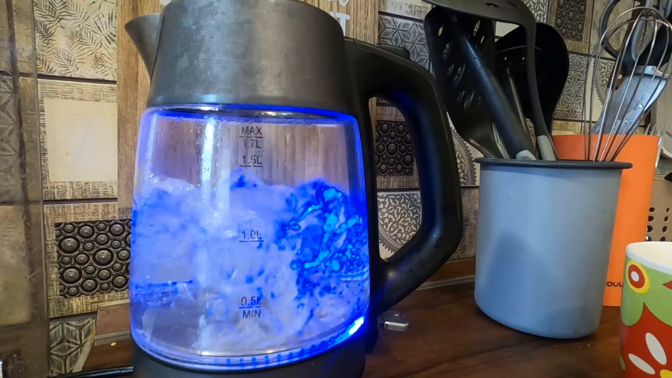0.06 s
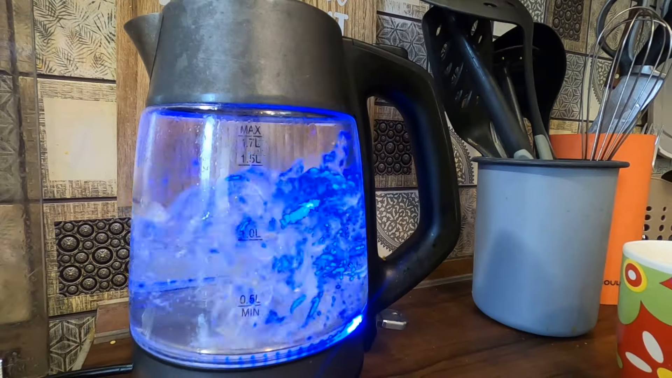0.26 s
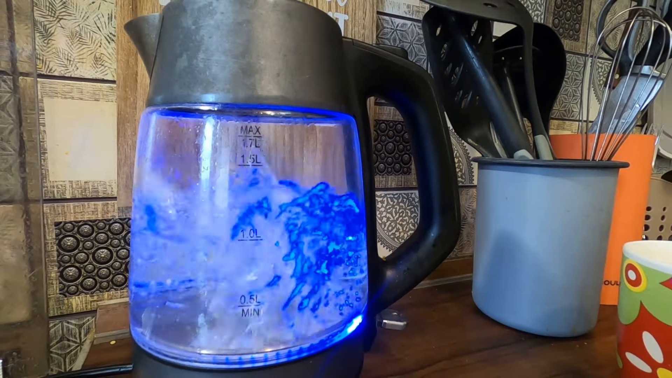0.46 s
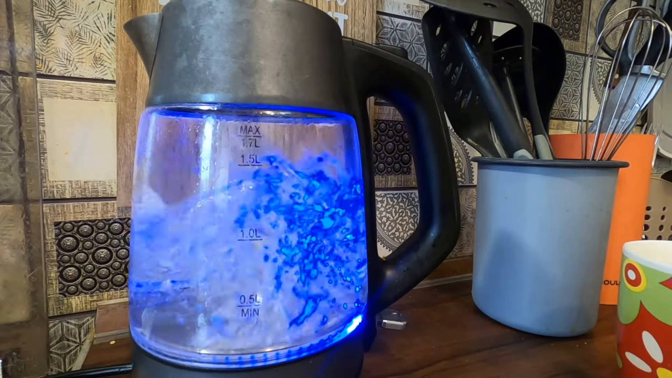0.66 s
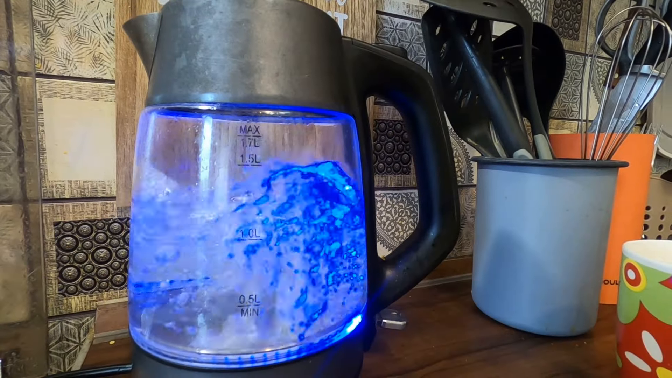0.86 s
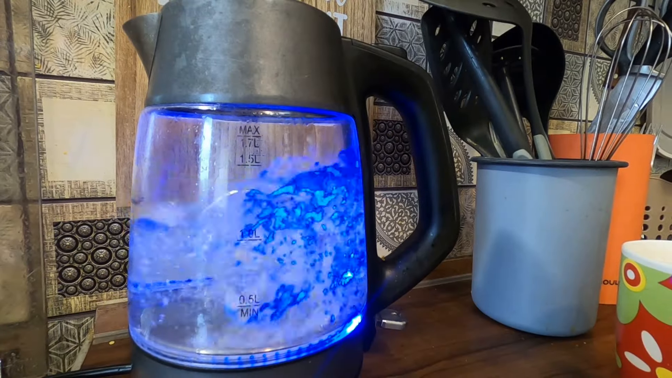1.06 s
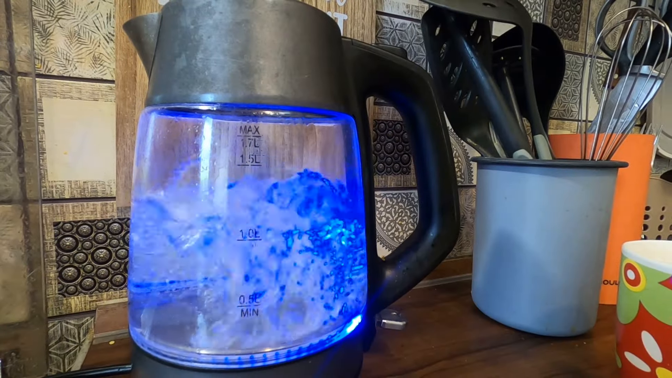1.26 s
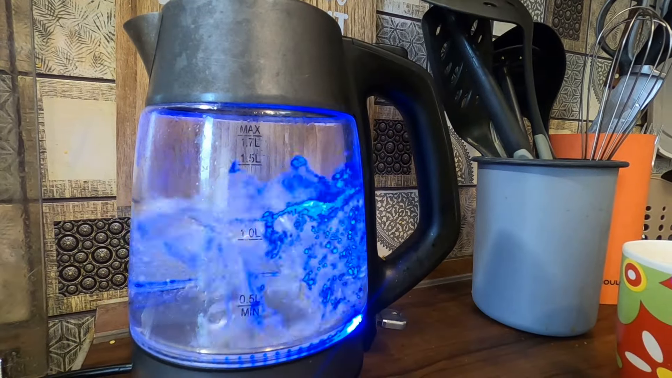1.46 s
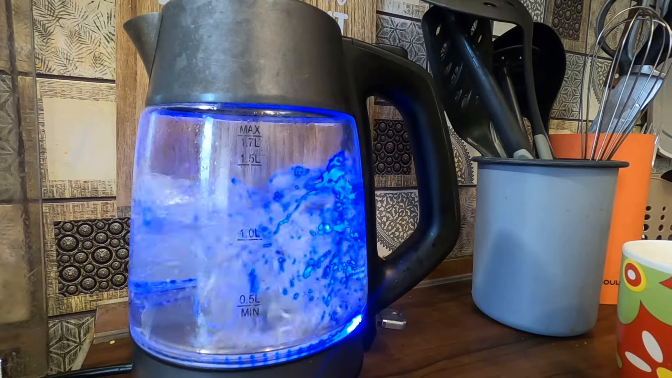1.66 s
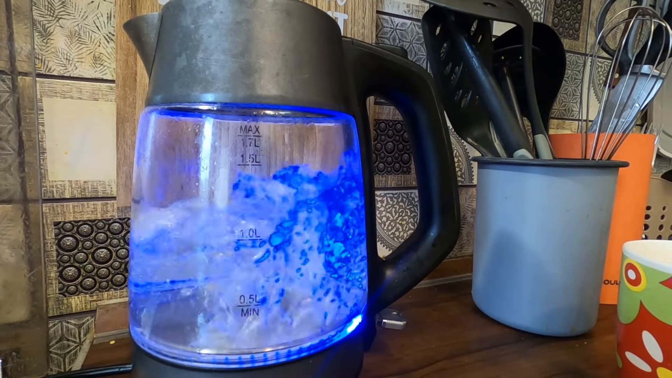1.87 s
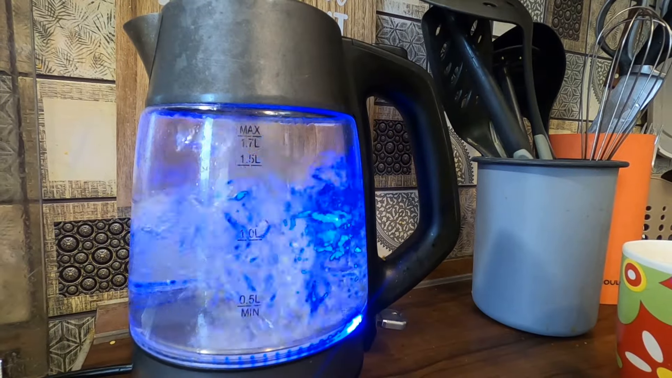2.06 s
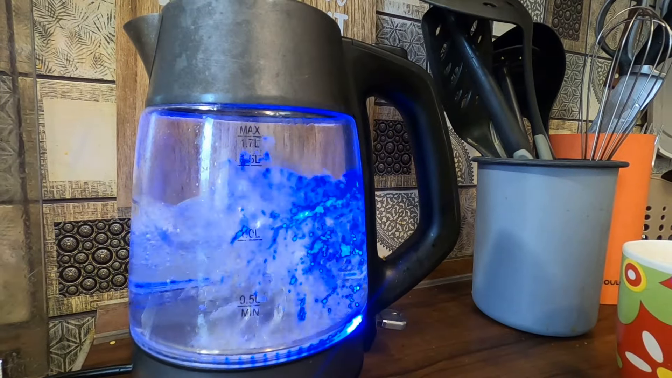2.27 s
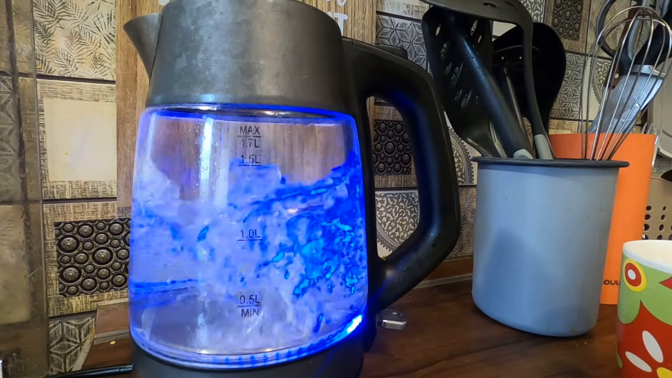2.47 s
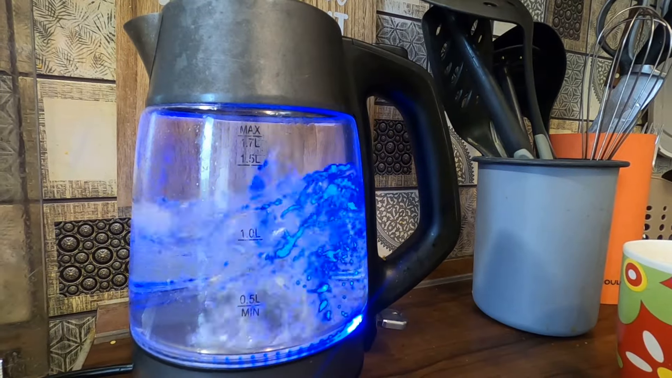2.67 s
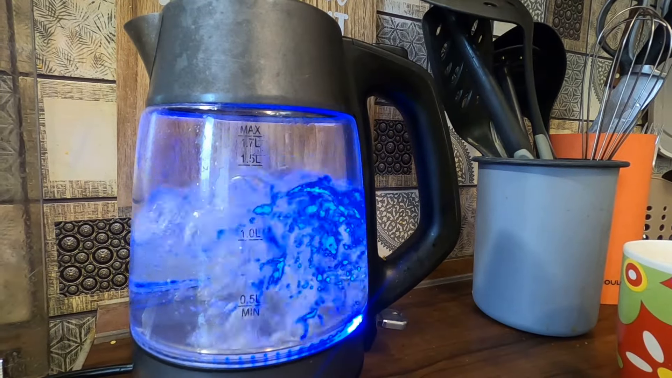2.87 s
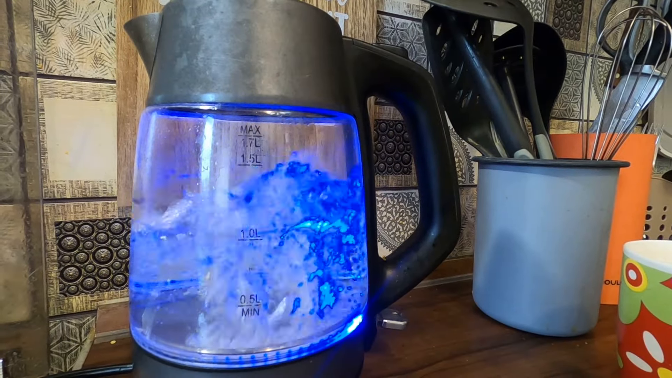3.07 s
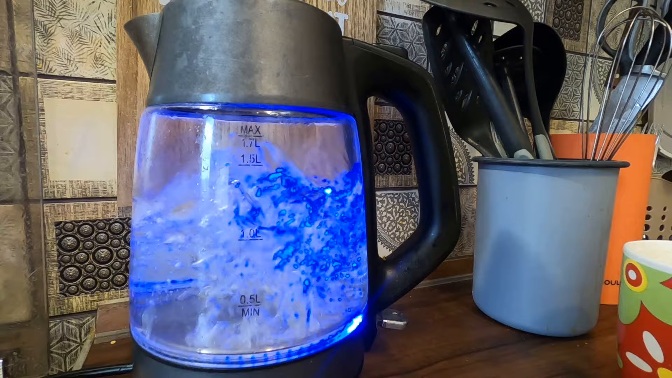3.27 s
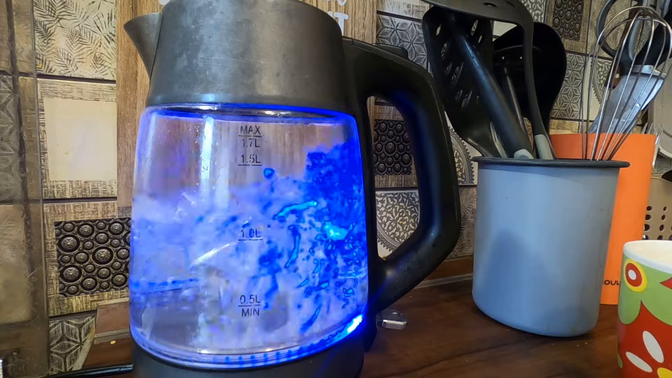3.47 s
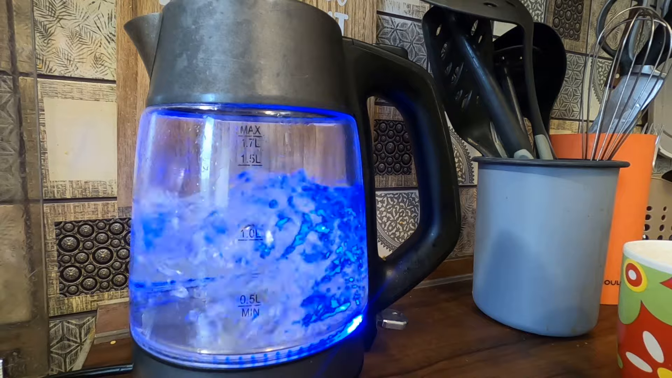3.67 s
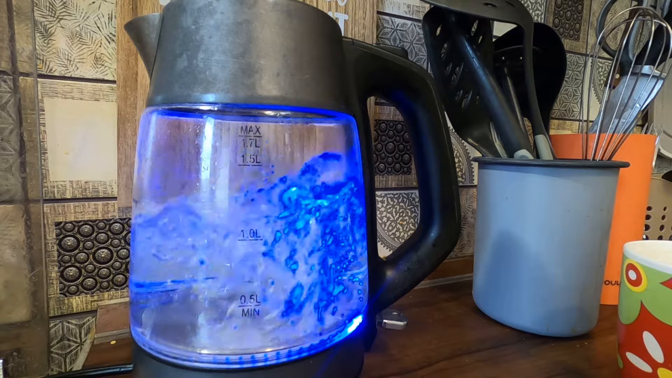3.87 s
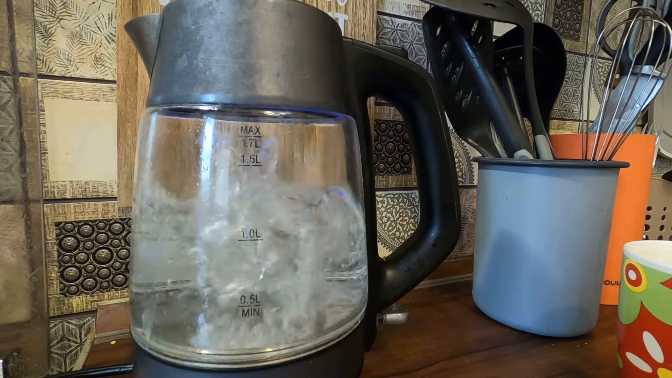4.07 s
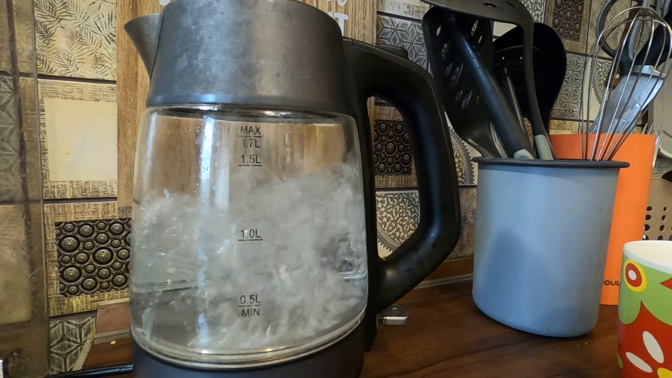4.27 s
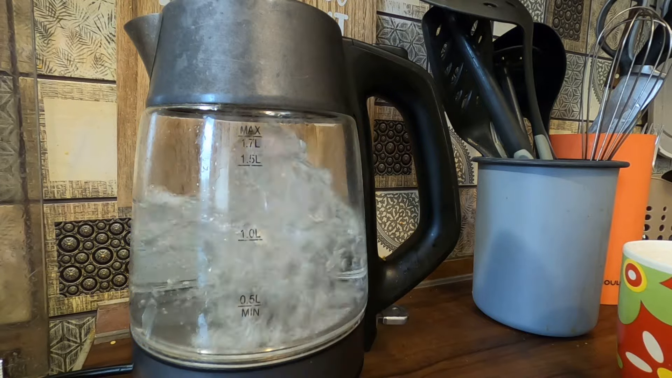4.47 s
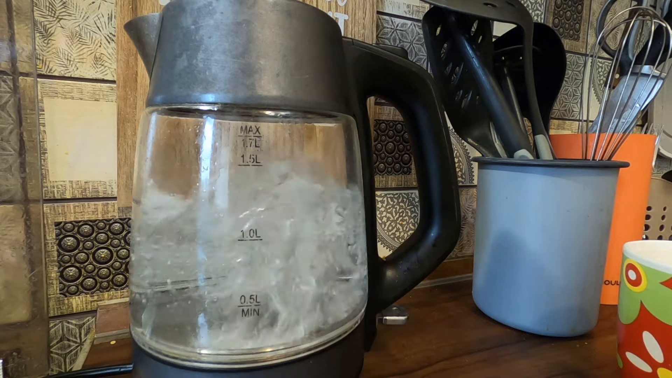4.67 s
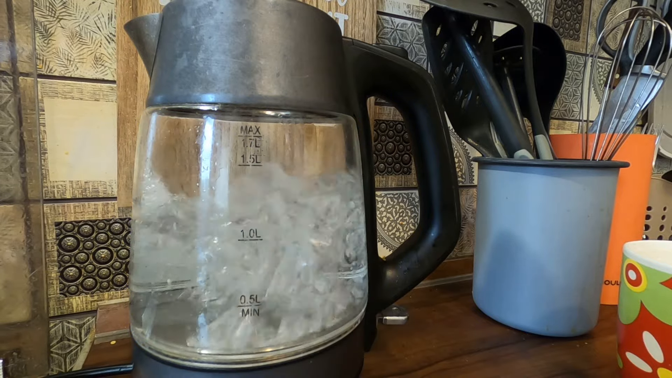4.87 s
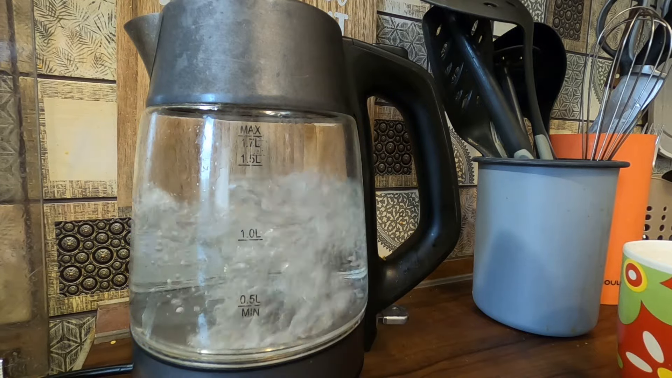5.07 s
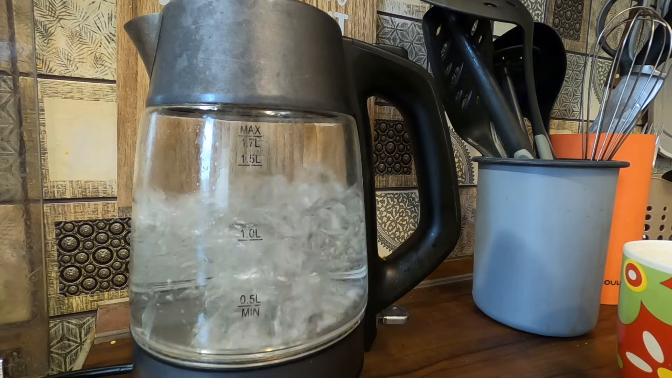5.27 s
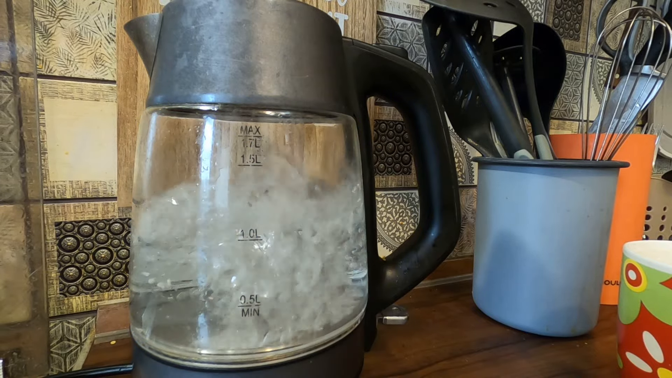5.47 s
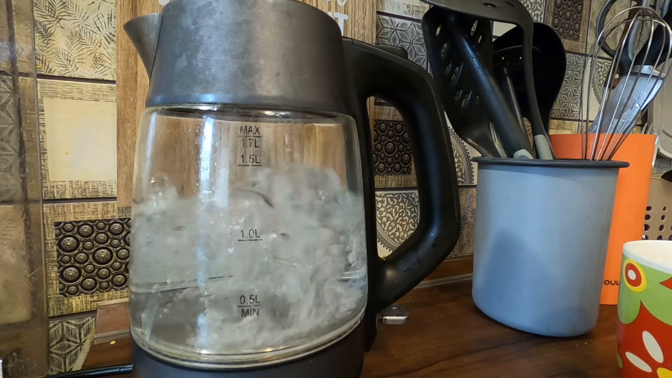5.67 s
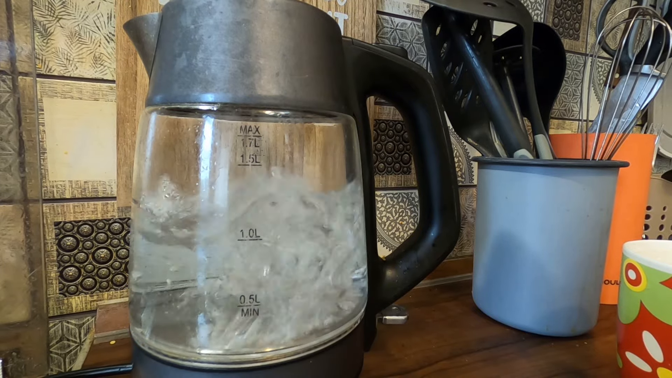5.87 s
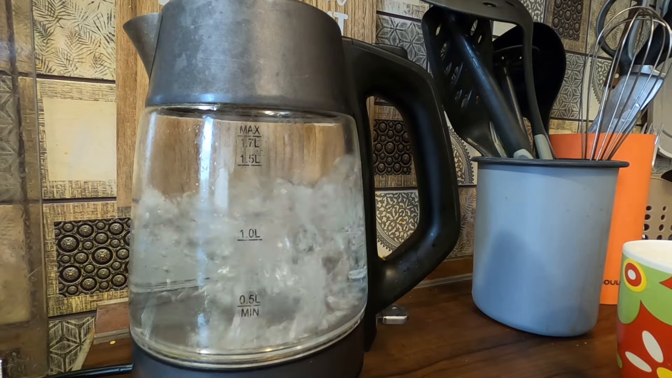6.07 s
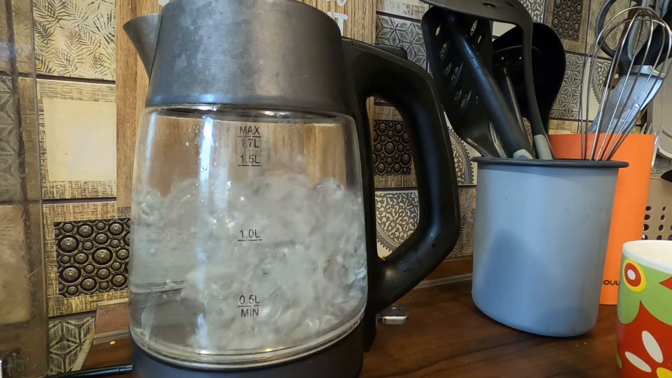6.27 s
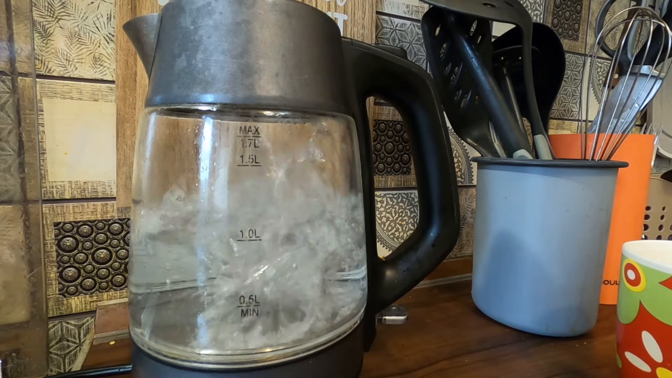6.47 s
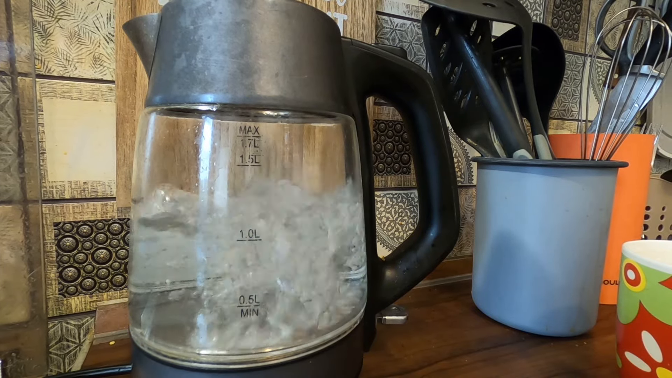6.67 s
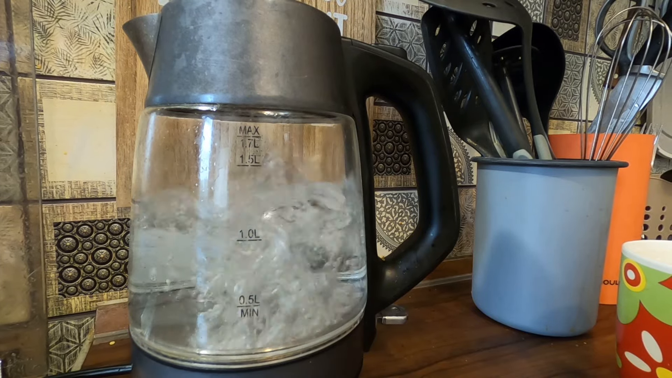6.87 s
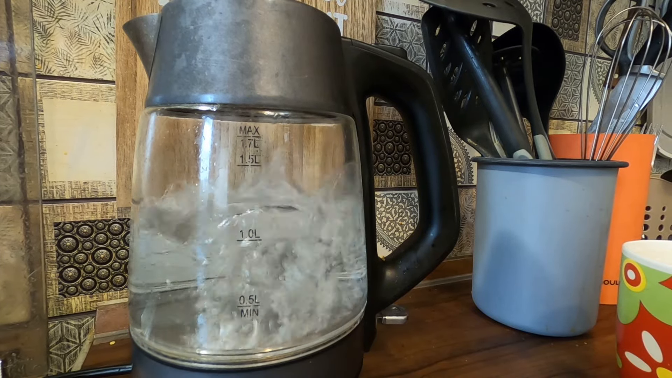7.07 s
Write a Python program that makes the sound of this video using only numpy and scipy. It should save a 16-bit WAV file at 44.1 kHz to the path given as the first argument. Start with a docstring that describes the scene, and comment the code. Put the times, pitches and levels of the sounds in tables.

```python
"""A deep, uneven rumble and thumping is heard first: a glass kettle at a rolling boil, close by, in mono.
Collapsing steam pockets excite the modes of water, counter and jug by short blows.
The surface gurgles, spits and ticks: noise in bursts and ringing bubbles, filtered by the glass wall.
The level drops out briefly near the start; later a switch snaps off as struck modes and a crack of noise.
A wide hiss, noise independent in the two channels, sets in abruptly at the end."""
import sys
import numpy as np
from scipy import signal
from scipy.io import wavfile
from scipy.ndimage import uniform_filter1d

SR = 44100
rng = np.random.default_rng(int(sys.argv[2]) if len(sys.argv) > 2 else 0)


def wav_out(sig):
    """Save sig, one row per channel (or a flat mono array), as 16-bit PCM at SR to the path in sys.argv[1]."""
    wavfile.write(sys.argv[1], SR, np.round(np.clip(np.atleast_2d(sig).T, -1, 1) * 32767).astype(np.int16))


N = 314433

# Swell of the boil, before wavering and bursts: time_s, jug_rumble_db, counter_drone_db, gurgle_db, spray_db
BOIL_LEVELS = [(.05, -27, -38.5, -47, -54.5), (.3, -32, -38.5, -45, -55.5), (.5, -33, -37, -45, -59.5),
               (.9, -30.5, -31.5, -46, -55.5), (1.25, -35, -37, -45.5, -57.5),
               (1.4, -30.5, -32, -49, -56.5), (1.51, -29, -36, -43.5, -56.5), (1.6, -29.5, -30, -48, -52.5),
               (1.75, -34.5, -40.5, -47, -59.5), (1.95, -30.5, -38, -46.5, -56.5),
               (2.09, -32, -44, -46.5, -59.5), (2.15, -33.5, -30.5, -54, -51.5),
               (2.3, -30.5, -35.5, -45, -61), (2.42, -32.5, -52, -46, -55.5),
               (2.48, -32.5, -30.5, -48.5, -58.5), (2.63, -29, -45.5, -45, -57.5),
               (2.7, -33.5, -28, -47.5, -53.5), (2.8, -31, -28.5, -48, -56.5),
               (2.9, -31.5, -32.5, -46.5, -57.5), (2.95, -33.5, -44, -50, -59.5),
               (3.1, -32.5, -34, -44.5, -57), (3.2, -39.5, -27, -44, -60), (3.26, -33, -38.5, -46.5, -57.5),
               (3.35, -33.5, -36, -47, -55.5), (3.51, -35, -33, -49, -57.5), (3.66, -30, -45, -56, -53),
               (3.8, -32, -36, -47.5, -57), (4.2, -33, -35.5, -45.5, -56.5), (4.35, -30.5, -30, -49, -51),
               (4.46, -38.5, -36.5, -45.5, -56), (4.56, -35.5, -30.5, -47, -57.5),
               (4.74, -35, -37, -50.5, -57), (4.8, -26, -28, -44.5, -55), (4.93, -34, -41, -48.5, -55.5),
               (5.02, -30.5, -34.5, -48.5, -56.5), (5.25, -33.5, -33, -47, -56),
               (5.31, -37.5, -39.5, -44.5, -59), (5.4, -37, -29, -44.5, -53), (5.49, -33, -34.5, -58, -57),
               (5.56, -31, -38, -46, -53), (5.7, -32, -35, -48, -54.5), (5.77, -43, -54, -48, -52),
               (5.85, -32.5, -33.5, -50, -56.5), (6.0, -35.5, -40.5, -45, -59),
               (6.14, -34, -32.5, -53, -55), (6.25, -31.5, -52, -47, -59), (6.42, -36, -36.5, -48, -56.5),
               (6.58, -33, -33.5, -48, -55), (6.7, -38, -40, -46.5, -59), (6.81, -29.5, -43, -45, -59.5),
               (6.89, -34, -33, -48.5, -58.5), (7.0, -32.5, -41.5, -47.5, -55)]
# Big steam collapses: start_s, peak_db
COLLAPSES = [(.02, -19), (.268, -20.5), (0.336, -18.5), (0.768, -19.5), (.817, -31), (.93, -29),
             (1.104, -18.5), (1.165, -22), (1.262, -30), (1.319, -21), (1.408, -20.5), (1.632, -18),
             (1.549, -23), (1.775, -18), (1.94, -16), (1.963, -15), (2.101, -19), (2.228, -23.5),
             (2.456, -16.5), (2.468, -24.5), (2.561, -20), (2.583, -19), (2.642, -14), (2.747, -14),
             (2.795, -16), (2.857, -22), (2.949, -23.5), (2.998, -18.5), (3.055, -19), (3.2, -18),
             (3.32, -20.5), (3.488, -19.5), (3.618, -18), (3.703, -18), (3.809, -23), (3.946, -19.5),
             (4.034, -18), (4.068, -21), (4.203, -26), (4.334, -20.5), (4.638, -25), (4.452, -23.5),
             (4.493, -21), (4.53, -17.5), (4.687, -20.5), (4.768, -27), (4.888, -18.5), (5.008, -23.5),
             (5.085, -20), (5.232, -20.5), (5.36, -20), (5.402, -17.5), (5.486, -20.5), (5.697, -20.5),
             (5.792, -20), (5.851, -27.5), (5.869, -27), (6.029, -21), (6.041, -24), (6.197, -24.5),
             (6.224, -23.5), (6.249, -26), (6.357, -16), (6.379, -27.5), (6.466, -22), (6.55, -20.5)]
# Four modes of heaving water, two of the counter, then the jug: pitch_hz, width_hz, relative_level_db
BODY_MODES = [(51.3, 33.5, -14.5), (73.1, 23.5, -6.5), (112, 19, -6.5), (151.3, 34.7, -8.5),
              (174.2, 23, -6.5), (194.74, 7.9, 4.5), (243, 15.8, -4), (280.1, 12.1, 3), (324.2, 16.4, -1.5),
              (345.8, 16.3, -8.5), (372.6, 11.2, -7), (394, 10.8, -7.5), (416.2, 21, -8.5),
              (456, 27, -21.5), (477, 13.6, -30.5), (533, 8.3, -19.5), (569.4, 9.2, -19), (616, 8.1, -32),
              (660, 16.6, -24), (712.5, 23, -22.5)]
SLOSH_DB = -37.5        # water heaving in its lowest modes
BODY_RING_DB = -39.5    # counter and jug ringing after the big collapses
SOFT_HZ = 837           # knocks through water carry no treble
# Each collapse leaves the knocking stronger for a moment: envelope times, then gain of the envelope
AFTERSHOCK_T60_S, AFTERSHOCK_RISE_S = 0.048, 0.0034
JUG_AFTERSHOCK, COUNTER_AFTERSHOCK = 6.5, 2.3
# Evening out the chance swells of counter and jug: averaging span, then share 0-1
STEADY_S, COUNTER_STEADINESS, JUG_STEADINESS = 0.045, 0.5, 0.85
# Layers waver as fast as the boil churns: rate, then spread in dB
WAVER_HZ, JUG_WAVER_DB, COUNTER_WAVER_DB, GURGLE_WAVER_DB = 9, 1.48, 0.5, 0.86

# Spectrum of the gurgle: pitch_hz, relative_level_db (per Hz)
GURGLE_SPECTRUM = [(260, 4.5), (450, -0.5), (557, 0), (611, -2.5), (712, -5), (771, -5), (2200, -22.5),
                   (2860, -39), (4840, -120)]
# Spectrum of spray and sizzle: pitch_hz, relative_level_db (per Hz)
SPRAY_SPECTRUM = [(880, -2.5), (1500, -2), (1980, -8.5), (2370, -8), (2660, -9.5), (3590, -16), (4290, -20),
                  (4780, -19), (7800, -25.5), (8600, -30.5), (11000, -41.5), (14200, -49.5), (16000, -53.5)]
SIZZLE_DB = -62.5
SPLASH_TAIL_T60_S, SPLASH_TAIL_GAIN = 0.072, 41   # spray keeps falling after a splash

# Splashes, before layer gains and filters: start_s, peak_db, droplet_pitch_hz,
# fine_spray_db (re peak_db), droplet_ring_db (re peak_db)
SPLASHES = [(0.2798, -51, 1700, -19, -6), (0.3, -37.5, 2330, -21, -4), (0.317, -43, 2320, -21, -7),
            (0.3546, -43, 2150, -22, -1), (0.3937, -32, 2340, -28.5, -5), (0.431, -33, 1710, -15, -12),
            (0.4443, -38, 1870, -28, -4), (0.5472, -39.5, 2300, -24.5, -8), (0.5871, -44, 1960, -25, -3),
            (0.653, -36.5, 2270, -16, -13), (0.668, -33.5, 1910, -13.5, -13),
            (0.7108, -34.5, 3050, -27, -11), (0.7317, -42, 2180, -21, -6), (0.7587, -31, 2230, -11, -17),
            (0.7706, -32, 1790, -21, -5.5), (0.813, -36, 2220, -21, -8), (0.846, -40, 2330, -26, -3),
            (0.8939, -35, 2330, -21, -9), (0.9114, -42, 1750, -26, -5), (0.9303, -37, 2270, -21, -6.5),
            (1.0026, -43, 1730, -17, -12), (1.0276, -40, 2200, -17, -13), (1.091, -36, 1810, -21, -8),
            (1.1383, -26, 2280, -21, -16), (1.1674, -37, 2040, -11, -12), (1.244, -42.5, 2330, -21, -1),
            (1.3119, -43, 1710, -25, -9), (1.3374, -35.5, 1810, -17, -8), (1.362, -39, 1700, -16, -3),
            (1.4464, -39, 2300, -31, 0), (1.512, -45, 2220, -23, 0), (1.5509, -37, 1800, -11, -11),
            (1.5772, -35, 2360, -15, -9), (1.629, -37, 1730, -17, -13), (1.6791, -40, 1800, -25, -0.5),
            (1.7244, -39, 2000, -11, -16), (1.803, -31, 1950, -15, -17), (1.8886, -34, 1920, -13, -10.5),
            (1.9063, -41.5, 2300, -28, -3), (1.9729, -43.5, 2230, -28, 4.5), (2.07, -39, 2320, -23, -7),
            (2.092, -37, 2600, -30, -7), (2.1256, -42, 2260, -9, -7), (2.19, -39, 1940, -21, -8),
            (2.2977, -39, 1690, -12, -6), (2.3263, -26.5, 1730, -34, -13), (2.3865, -38, 1710, -23, -6),
            (2.4635, -33, 2370, -15, -15), (2.5062, -40.5, 2300, -24, -8), (2.5621, -46, 2320, -21, -9),
            (2.6324, -38, 1780, -18, -14), (2.6683, -37, 2310, -13, -7), (2.808, -44, 2310, -21, -13),
            (2.8345, -38.5, 2050, -26, -1), (2.9013, -45, 2020, -22, -3), (2.9302, -46, 2270, -23, -2),
            (2.9821, -43, 2270, -20, -10), (3.031, -35, 1840, -15, -16), (3.051, -30, 2150, -26, -16),
            (3.162, -42.5, 1770, -21, 1), (3.1844, -38, 1800, -17, -10), (3.259, -35.5, 2360, -15, -19),
            (3.308, -40, 1860, -21, -15), (3.315, -36, 1680, -20, -12), (3.319, -44, 2020, -20, -5),
            (3.3234, -31, 2350, -34, -0.5), (3.3484, -40, 2310, -21, -9), (3.4492, -35, 1700, -15, -8),
            (3.5164, -48, 1850, -16, -9), (3.558, -39, 2350, -11, -10), (3.5786, -33, 2300, -13, -13),
            (3.6043, -27, 1770, -22, -18), (3.628, -29, 1750, -21, -19), (3.722, -42, 1960, -9, -19),
            (3.755, -39, 1750, -18, -14), (3.8057, -40, 1840, -27, -7), (3.8225, -38, 2480, -19, -2.5),
            (3.8676, -42, 2050, -22, -3), (3.9679, -35, 2150, -18, -15), (3.9896, -28.5, 2350, -16, -10),
            (4.0148, -43, 1900, -25, 1), (4.0682, -36.5, 2310, -8, -9), (4.092, -34, 2370, -12, -12),
            (4.123, -32, 2300, -25, -7), (4.4174, -46, 1790, -20, -10), (4.4313, -37, 1760, -21, -12),
            (4.543, -41, 1710, -31, -0.5), (4.571, -36, 2470, -25, -5.5), (4.6907, -35.5, 2090, -18, -11),
            (4.753, -36, 2280, -9, -12), (4.812, -40, 2250, -25, -3), (4.9086, -39, 2300, -14, -0.5),
            (4.9701, -32, 2230, -22, -12), (5.027, -43, 2350, 3, -12), (5.1577, -45, 1740, -8, -10),
            (5.223, -30, 2300, -19, -20), (5.2904, -37, 2140, -15, -7), (5.3027, -38, 1870, -27, -5),
            (5.347, -31.5, 2670, -25, -5.5), (5.4087, -39.5, 1760, -24, 1), (5.471, -32.5, 2650, -19, -14),
            (5.6144, -37, 2320, -9, -18), (5.6481, -34.5, 2690, -16, -6), (5.675, -50, 2830, -18, -8),
            (5.695, -36, 1750, -24, -1), (5.7028, -35.5, 2340, -26, -1), (5.8212, -35.5, 1780, -24, -11),
            (5.893, -30, 1890, -20, -13), (5.909, -25, 2230, -32, -14), (5.9414, -36, 1900, -20, -9),
            (5.9884, -50, 1890, -5, -9), (6.073, -34, 3070, -12.5, -13), (6.127, -30.5, 2310, -21, -19),
            (6.1938, -36, 1800, -25, -6), (6.376, -36, 2350, -24, -9), (6.4288, -39, 2880, -12, -10),
            (6.4782, -54, 2330, -22, -12), (6.5355, -40, 1680, -23, -1), (6.565, -36, 2300, -25, -9),
            (6.6523, -35.5, 1700, -21, -11), (6.759, -37, 1720, -12, -8.5), (6.9042, -40, 1700, -10, -9),
            (6.94, -28.5, 1750, -32, -13)]
SPLASH_TICKS_PER_S, SLAP_DB, FINE_SPRAY_DB = 1500, -7.5, -4.5
# Large bubbles bursting, before filters: start_s, peak_db, pitch_hz
LARGE_BUBBLES = [(0.516, -47, 524), (0.666, -27, 650), (1.004, -25.5, 740), (1.882, -31, 710),
                 (1.933, -24.5, 580), (1.954, -29, 563), (2.561, -35, 694), (2.965, -31.5, 1090),
                 (3.398, -31, 680), (3.817, -26, 670), (4.677, -30, 527), (5.01, -26, 533),
                 (6.128, -26, 530), (6.357, -37, 660), (6.616, -25, 540)]
# Small bubbles bursting, before filters: start_s, peak_db, pitch_hz
SMALL_BUBBLES = [(0.56, -40, 910), (0.931, -37, 907), (0.968, -40, 1280), (1.375, -32, 851),
                 (1.401, -32, 1050), (1.447, -29, 1380), (1.777, -33, 1090), (2.081, -38, 1400),
                 (2.187, -34, 853), (2.355, -38, 937), (2.415, -38, 1140), (2.598, -40, 1090),
                 (2.625, -37, 918), (2.669, -33.5, 1350), (2.747, -39, 1360), (2.832, -35, 1040),
                 (2.864, -32, 851), (3.076, -38, 1270), (3.456, -34.5, 1050), (3.606, -31, 883),
                 (3.844, -39, 1090), (4.072, -31, 1450), (4.125, -34, 1320), (4.476, -35, 1080),
                 (4.552, -31.5, 867), (4.768, -35, 1200), (4.839, -38, 1260), (4.925, -38, 1090),
                 (5.276, -34, 1080), (5.334, -36, 851), (5.36, -35, 1050), (5.41, -36, 896),
                 (5.453, -36, 1400), (5.866, -34.5, 1100), (6.112, -33, 1030), (6.285, -36, 956),
                 (6.381, -35.5, 1150), (6.533, -41, 1110)]
BUBBLE_RISE = 0.03   # pitch climbs by up to this share per cycle as a bubble nears the surface

# Sharp drops hitting the glass, envelope level before colouring: start_s, level_db
GLASS_DROPS = [(0.4319, -57), (0.6519, -60), (0.7692, -50), (0.8215, -59), (1.0221, -60), (1.1373, -60),
               (1.1682, -58), (1.3379, -60), (1.3628, -63), (1.6287, -56), (1.8352, -60), (2.1006, -67),
               (2.1331, -55), (2.2797, -58), (2.43, -58), (2.4733, -55), (2.6524, -61), (3.03, -61),
               (3.0799, -61), (3.2535, -64), (3.5872, -62), (3.6047, -56), (3.6805, -55), (3.8402, -57),
               (3.9454, -53), (3.9913, -61), (4.0676, -52), (4.0991, -53), (4.1919, -62), (4.6174, -62),
               (4.6753, -64), (4.7157, -64), (4.7516, -63), (4.8299, -59), (4.9711, -62), (5.0285, -50.5),
               (5.1906, -55), (5.2909, -57), (5.3477, -60), (5.3877, -62), (5.434, -61), (5.4735, -59),
               (5.4834, -57), (5.5378, -61), (5.6126, -63), (5.6236, -61), (5.7264, -59), (5.8955, -56),
               (5.9888, -59), (6.2367, -61), (6.9092, -61), (6.9411, -58)]
# Spectrum of a drop: pitch_hz, relative_level_db (per Hz)
DROP_SPECTRUM = [(3500, 2.5), (7500, 2), (10000, -9), (13000, -14.5), (16000, -12)]
SPATTER_PER_S, SPATTER_DB, DROP_T60_S = 150, -98, 0.019   # countless weaker drops; rms level of their clicks
# Modes of the glass wall: pitch_hz, width_hz, boost_db
GLASS_MODES = [(1090, 21, 6), (1360, 78, 2), (2350, 60, 5.5), (2700, 100, 1.5), (3050, 26, 5.5),
               (3880, 27, 3), (4250, 140, 6.5), (7520, 110, 5.5), (8270, 330, -5.5)]

# Close blows of the switch: start_s, level_db
SWITCH_BLOWS = [(4.2395, -32), (4.2436, -15), (4.2462, -12), (4.2485, -23), (4.2605, -26), (4.274, -43)]
# Modes of the switch housing, before a common offset: pitch_hz, relative_level_db, t60_s
SWITCH_MODES = [(485, 3, 0.023), (600, -2.5, 0.032), (930, -22, 0.015), (1096, 0.5, 0.021),
                (1210, -6, 0.0097), (1447, -5, 0.024), (1800, -7, 0.03), (2000, -9, 0.027),
                (2540, -19, 0.026), (2660, -10, 0.041), (3050, -15, 0.038), (3310, -5.5, 0.02),
                (3680, -9, 0.026), (3700, -26, 0.023), (6320, -14, 0.017), (7080, -17, 0.025)]
# Spectrum of the crack and its tail: pitch_hz, relative_level_db (per Hz)
CRACK_SPECTRUM = [(470, -31), (800, -8), (1130, -8), (1270, -6), (1440, -3.5), (2170, -5), (3890, -15.5),
                  (7300, -24.5), (10300, -27), (11500, -39), (13500, -38), (15700, -46)]
CRACK_DB, CRACK_T60_S = -33.5, 0.038
TAIL_DB, TAIL_T60_S, TAIL_CUT_HZ = -46, 0.31, 10000

# Gain over all kettle sounds, with a brief drop near the start: time_s, gain_db
LEVEL_DROP = [(.1, 2.5), (.109, -3), (.112, -19), (.13, -19.5), (.2, -21.5), (.235, -30), (.2535, -43),
              (.2545, 4)]
# Spectrum of the closing hiss: pitch_hz, relative_level_db (per Hz)
HISS_SPECTRUM = [(18, -26), (30, -9), (105, 3), (285, -38), (400, -8), (1270, -12), (2300, -15),
                 (4200, -12), (9000, -17), (15600, -21)]
HISS_START_S, HISS_DB, HISS_PAN_DB = 7.005, -40, -1.5   # pan: left level minus right level
CUTOFF_HZ = 15700


def push(x):
    """Resonant filtering: a collapse drives the water as a short, band-limited low pulse."""
    x = resonance(x, hz=273.2, width_hz=54)
    x = resonance(x, hz=295, width_hz=153)
    return between(x, low_hz=134, high_hz=432)


def rumble(rumble_db, drone_db):
    """Forced vibration: collapsing steam pockets knock jug and counter; the water heaves below."""
    unit_peak = np.max(np.abs(push(clicks_at([(0, 0.011)]))))
    collapses = clicks_at(COLLAPSES)
    thumps = push(collapses) / unit_peak
    ringing = from_db(BODY_RING_DB) * body(collapses, BODY_MODES[4:])
    knocks = grains(per_s=320, uneven_db=2.1) + 0.7 * rng.standard_normal(N)
    aftershock = swell(COLLAPSES, AFTERSHOCK_T60_S, AFTERSHOCK_RISE_S)

    jug = steady(body(knocks, BODY_MODES[6:]), JUG_STEADINESS)
    jug = jug * rms_one(1 + JUG_AFTERSHOCK * aftershock)
    jug = jug * from_db(rumble_db + JUG_WAVER_DB * drift(WAVER_HZ))

    counter = steady(body(knocks, BODY_MODES[4:6]), COUNTER_STEADINESS)
    counter = counter * rms_one(1 + COUNTER_AFTERSHOCK * aftershock)
    counter = counter * from_db(drone_db + COUNTER_WAVER_DB * drift(WAVER_HZ))

    slosh = body(rng.standard_normal(N), BODY_MODES[:4]) * from_db(SLOSH_DB + 1.0 * drift(4.2))
    return thumps + ringing + jug + counter + slosh


def surface(gurgle_db, spray_db):
    """Modulated noise and bubble resonance: gurgle and spray arrive in sudden bursts that die away."""
    surges = fade(grains(per_s=45, uneven_db=5.0), t60=0.058) / 30
    # A larger constant makes the gurgle steadier than the spray
    gurgle_bursts, spray_bursts = rms_one(4.6 + surges), rms_one(1.43 + surges)

    gurgle_wash = rms_one(coloured(gurgle_bursts * rng.standard_normal(N), GURGLE_SPECTRUM, patchy_db=1.0))
    gurgle_bubbles = bubbles(GURGLE_SPECTRUM, per_s=600, cycles=20, bursts=gurgle_bursts)
    gurgle = rms_one(gurgle_wash + 0.62 * gurgle_bubbles)
    gurgle = gurgle * from_db(gurgle_db + GURGLE_WAVER_DB * drift(WAVER_HZ))

    spray_wash = rms_one(coloured(spray_bursts * rng.standard_normal(N), SPRAY_SPECTRUM, patchy_db=1.5))
    spray_bubbles = bubbles(SPRAY_SPECTRUM, per_s=2200, cycles=21, bursts=spray_bursts)
    spray = rms_one(spray_wash + between(spray_bubbles, low_hz=704, high_hz=5540))
    falling = 1 + SPLASH_TAIL_GAIN * swell(SPLASHES, SPLASH_TAIL_T60_S, rise_s=0.0093)
    spray = spray * falling * from_db(spray_db)

    # Steam and the finest mist never pause
    sizzle = rms_one(coloured(rng.standard_normal(N), SPRAY_SPECTRUM, patchy_db=4.0))
    return gurgle + spray + from_db(SIZZLE_DB) * sizzle


def bubbles(spectrum, per_s, cycles, bursts, count=24):
    """Bubble resonance: each rings a few cycles, at pitches dealt across the spectrum; rms 1."""
    born = grains(per_s, uneven_db=3.5, largest=4.1) * bursts
    dealt = rng.integers(0, count, N)
    total = 0
    for k, hz in enumerate(np.geomspace(spectrum[0][0], spectrum[-1][0], count)):
        # Higher rings are shorter and fill wider bands, so their height grows with pitch
        height = from_db(at_hz(spectrum, hz)) * hz
        total = total + height * ring(born * (dealt == k), hz, cycles / hz)
    return rms_one(total)


def spits():
    """Impact and resonance: splashes of ticks, fine spray and ringing droplets; bubbles burst with a plop."""
    impacts = grains(SPLASH_TICKS_PER_S, uneven_db=9.0, largest=3.1) + 0.36 * rng.standard_normal(N)
    impacts = rms_one(impacts)
    slap = steeply(swell(SPLASHES, t60=0.031, rise_s=0.0014) * impacts, low_hz=1200, high_hz=4640)

    puffs = [(s, db + fine_db) for s, db, hz, fine_db, ring_db in SPLASHES]
    mist = rms_one(0.29 * impacts + rng.standard_normal(N))
    fine = steeply(swell(puffs, t60=0.048, rise_s=0.0049) * mist, low_hz=3600, high_hz=9200)

    rings = [(s, db + ring_db, hz) for s, db, hz, fine_db, ring_db in SPLASHES]
    droplets = steeply(drops(rings, cycles=36), low_hz=1320, high_hz=5000)
    plops = between(drops(LARGE_BUBBLES, cycles=7.9), low_hz=400, high_hz=1300)
    blips = between(drops(SMALL_BUBBLES, cycles=10.8), low_hz=700, high_hz=2200)
    return from_db(SLAP_DB) * slap + from_db(FINE_SPRAY_DB) * fine + droplets + plops + blips


def drops(rows, cycles):
    """Bubble resonance: one decaying sine for each row, its pitch climbing at a pace of its own."""
    out, t = np.zeros(N + 3000), np.arange(3000) / SR
    paces = rng.random(len(rows)) ** 2
    for (s, db, hz), pace in zip(rows, paces):
        i = round((s + 0.00084) * SR)
        turns = hz * t
        rise = BUBBLE_RISE * pace
        phase = 2 * np.pi * turns * (1 - rise + rise * np.minimum(turns, cycles) / 2)
        out[i:i + 3000] += from_db(db - 60 * turns / cycles) * np.sin(phase)   # 60 dB down after "cycles"
    return out[:N]


def ticks():
    """Impact noise: each drop is a short bright puff; weaker ones come at random."""
    spatter = from_db(SPATTER_DB) * grains(SPATTER_PER_S, uneven_db=3.5, largest=2.5)
    puffs = swell(GLASS_DROPS, DROP_T60_S, rise_s=0.0016) + fade(spatter, DROP_T60_S)
    return coloured(puffs * rng.standard_normal(N), DROP_SPECTRUM, patchy_db=2.5)


def glass(x):
    """Wall resonance: the glass raises or lowers what strikes it at its own modes."""
    return x + sum((from_db(db) - 1) * resonance(x, hz, width) for hz, width, db in GLASS_MODES)


def switch():
    """Struck modes: a switch snaps with a few close blows; a crack and short kitchen tail follow."""
    blows = clicks_at(SWITCH_BLOWS)
    # Loose parts settle
    rattle = from_db(-41.5) * fade(blows, t60=0.28) * grains(per_s=530, uneven_db=2.0, largest=2.1)
    modes = 0
    for hz, db, t60 in SWITCH_MODES:
        uneven_db = rng.normal(0, 1.0, N)   # each click strikes each mode a little differently
        modes = modes + ring((blows + rattle) * from_db(db - 11.5 + uneven_db), hz, t60)
    modes = between(modes, low_hz=250, high_hz=11000)    # plastic contacts are not perfectly hard

    start = blows / blows.max()
    crack = from_db(CRACK_DB) * fade(start, CRACK_T60_S) * rng.standard_normal(N)
    tail = from_db(TAIL_DB + 1.5 * drift(43)) * fade(start, TAIL_T60_S) * rng.standard_normal(N)
    # Walls swallow the treble
    tail = signal.sosfilt(signal.butter(2, TAIL_CUT_HZ, fs=SR, output="sos"), tail)
    unit = np.std(coloured(rng.standard_normal(N), CRACK_SPECTRUM, patchy_db=0))
    return modes + coloured(crack + tail, CRACK_SPECTRUM, patchy_db=0) / unit


def hiss():
    """Uncorrelated noise: a smooth hiss, unrelated left and right, starts abruptly and sounds wide."""
    noise = rms_one(coloured(rng.standard_normal((2, N)), HISS_SPECTRUM, patchy_db=0))
    sounding = np.arange(N) >= HISS_START_S * SR
    return noise * sounding * from_db(HISS_DB + HISS_PAN_DB * np.array([[.5], [-.5]]))


def body(x, modes):
    """Modal superposition: a soft blow into parallel modes, signs alternating; rms 1."""
    soft = signal.sosfilt(signal.butter(4, SOFT_HZ, fs=SR, output="sos"), x)
    total = 0
    for k, (hz, width, db) in enumerate(modes):
        total = total + (-1) ** k * from_db(db) * resonance(soft, hz, width)
    return rms_one(total)


def steady(x, share):
    """Level compression: even out the chance swells of a ringing sound; rms 1."""
    power = uniform_filter1d(x ** 2, size=round(STEADY_S * SR))
    return rms_one(x / power ** (share / 2))


def resonance(x, hz, width_hz):
    """Damped resonance: a two-pole band-pass with gain of about 1 at its peak."""
    r = np.exp(-np.pi * width_hz / SR)
    b = [(1 - r * r) / 2, 0, (r * r - 1) / 2]
    a = [1, -2 * r * np.cos(2 * np.pi * hz / SR), r * r]
    return signal.lfilter(b, a, x + 1e-18)


def ring(clicks, hz, t60):
    """Free vibration: a unit click starts a decaying sine of initial height 1."""
    r, w = from_db(-60 / (t60 * SR)), 2 * np.pi * hz / SR
    return signal.lfilter([0, np.sin(w)], [1, -2 * r * np.cos(w), r * r], clicks + 1e-18)


def fade(clicks, t60):
    """Exponential decay: each click starts an envelope that dies away."""
    return signal.lfilter([1], [1, -from_db(-60 / (t60 * SR))], np.abs(clicks) + 1e-18)


def swell(rows, t60, rise_s):
    """Attack and decay: each event leaves an envelope that rises quickly and dies away."""
    r = np.exp(-1 / (rise_s * SR))
    return signal.lfilter([1 - r], [1, -r], fade(clicks_at(rows), t60))


def clicks_at(rows):
    """Impulse excitation: one click for each row's start_s and level_db."""
    out = np.zeros(N)
    for s, db, *_ in rows:
        out[round(s * SR)] += from_db(db)
    return out


def grains(per_s, uneven_db, largest=5):
    """Random impulses: many small clicks and a few large, of either sign; rms 1."""
    sizes_db = uneven_db * np.minimum(rng.exponential(1, N), largest)
    sizes = from_db(sizes_db) * rng.choice([-1, 1], N)
    return rms_one(sizes * (rng.random(N) < per_s / SR))


def coloured(x, spectrum, patchy_db):
    """Band analysis: third-octave bands, each at its own level and flickering by patchy_db on its own."""
    edges = spectrum[0][0] * 2 ** (np.arange(32) / 3)
    edges = edges[edges < min(spectrum[-1][0] * 1.25, .45 * SR)]
    out = 0
    for k, (low, high) in enumerate(zip(edges, edges[1:])):
        gain = from_db(at_hz(spectrum, np.sqrt(low * high)) + patchy_db * drift(6.2))
        out = out + (-1) ** k * between(x, low, high) * gain
    return out


def drift(rate_hz):
    """Low-passed noise: slow chance variation, spread 1, made at SR / 40 and interpolated."""
    r = np.exp(-80 * np.pi * rate_hz / SR)
    slow = signal.lfilter([1], [1, -2 * r, r * r], rng.standard_normal(N // 40 + 2002))
    slow = slow[2000:]   # let the filter settle
    return np.interp(np.arange(N) / 40, np.arange(len(slow)), rms_one(slow))


def between(x, low_hz, high_hz):
    """Band-pass filtering: keep what lies between two frequencies."""
    return signal.sosfilt(signal.butter(2, [low_hz, high_hz], "band", fs=SR, output="sos"), x + 1e-18)


def steeply(x, low_hz, high_hz):
    """Cascaded filtering: the same band-pass twice, for steep edges."""
    return between(between(x, low_hz, high_hz), low_hz, high_hz)


def from_db(db):
    """Decibel law: amplitude gain of a level."""
    return 10 ** (np.asarray(db) / 20)


def rms_one(x):
    """Power normalization: scale to rms 1."""
    return x / np.sqrt(np.mean(x ** 2) + 1e-20)


def in_time(rows):
    """Linear interpolation: columns of a curve, one value per sample."""
    s, *columns = np.transpose(rows)
    return [np.interp(np.arange(N) / SR, s, column) for column in columns]


def at_hz(points, hz):
    """Logarithmic pitch: read a spectrum on a log frequency axis."""
    points_hz, levels_db = np.transpose(points)
    return np.interp(np.log(hz), np.log(points_hz), levels_db)


def scene():
    """Superposition: the kettle in the middle with its brief drop in level, hiss on both sides."""
    rumble_db, drone_db, gurgle_db, spray_db = in_time(BOIL_LEVELS)
    at_glass = surface(gurgle_db, spray_db) + spits() + ticks()
    kettle = rumble(rumble_db, drone_db) + glass(at_glass) + switch()
    return kettle * from_db(in_time(LEVEL_DROP)[0]) + hiss()


def record(dry):
    """Band limitation: a steep low-pass cuts the top."""
    return signal.sosfilt(signal.ellip(10, .5, 70, CUTOFF_HZ, fs=SR, output="sos"), dry)


dry = scene()
out = record(dry)
wav_out(out)
```